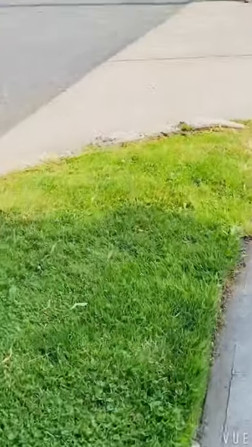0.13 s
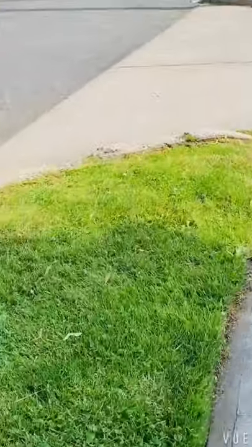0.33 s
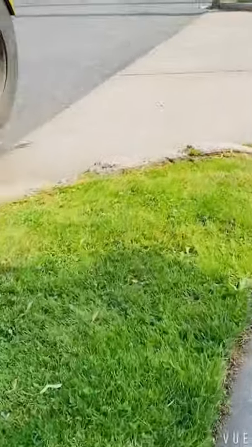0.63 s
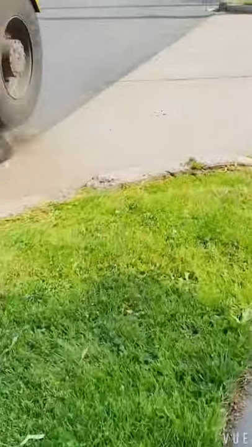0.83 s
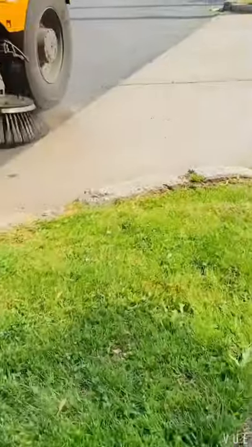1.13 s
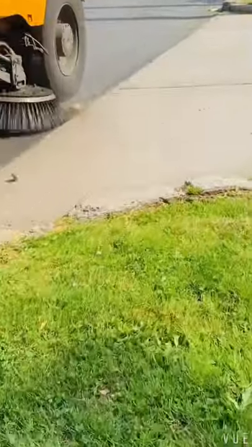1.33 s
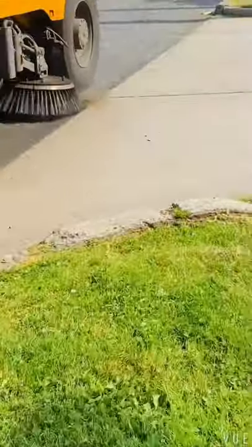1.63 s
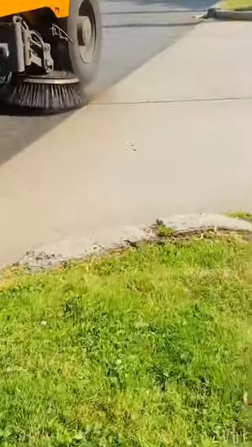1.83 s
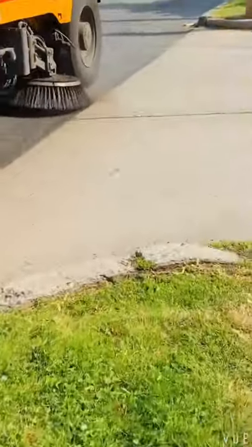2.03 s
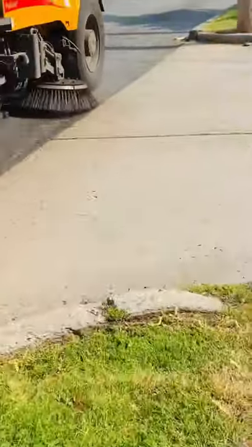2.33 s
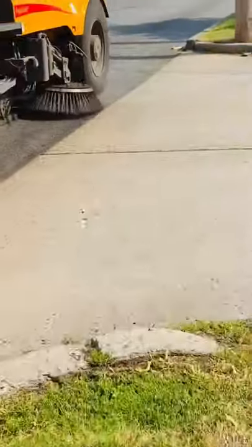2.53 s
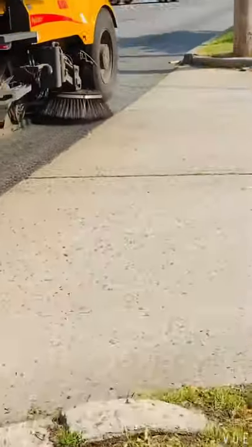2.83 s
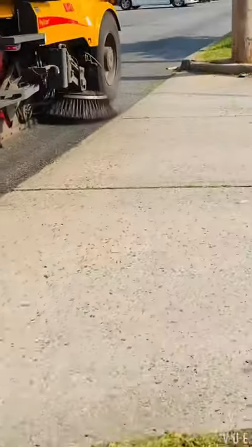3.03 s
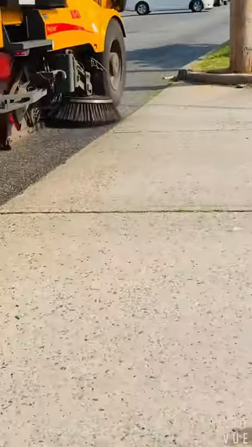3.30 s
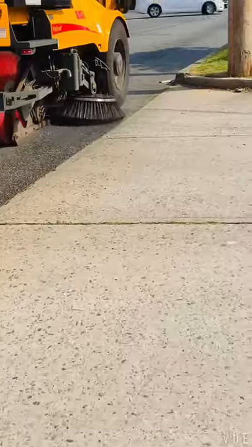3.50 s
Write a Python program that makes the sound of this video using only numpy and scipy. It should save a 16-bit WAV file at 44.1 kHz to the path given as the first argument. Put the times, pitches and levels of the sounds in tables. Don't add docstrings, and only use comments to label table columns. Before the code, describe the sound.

A street sweeper works slowly past a lawn, its diesel throbbing and suction fan rushing. Hydraulic whine rises then sinks, the wire brush hisses and ticks on grit, heard outdoors in stereo from nearby.

```python
import sys
import numpy as np
from scipy import signal
from scipy.fft import rfft, irfft, next_fast_len
from scipy.io import wavfile
from scipy.ndimage import uniform_filter1d, map_coordinates

SR = 44100
rng = np.random.default_rng(int(sys.argv[2]) if len(sys.argv) > 2 else 0)


def inscribe(sig):
    pcm = np.round(np.clip(np.atleast_2d(sig).T, -1, 1) * 32767)
    wavfile.write(sys.argv[1], SR, pcm.astype(np.int16))


def invert_db(level):
    return 10 ** (np.asarray(level, dtype=float) / 20)


N = 161406
T = np.arange(N) / SR
SHAFT_HZ = 31.56

# (time [s], level [dB])
ENGINE_SIDE = [(0.0, -23.5), (0.29, -20.5), (0.95, -25), (1.51, -31), (2.1, -28.5), (2.74, -34),
               (2.75, -30), (3.64, -28), (3.66, -26)]
# (time [s], level [dB])
BRUSH_PRESSURE = [(0.0, -38.5), (0.11, -33.5), (0.68, -29), (1.56, -28.5), (1.99, -32), (2.34, -31.5),
                  (2.97, -33), (3.1, -31), (3.15, -34.5), (3.66, -34)]


def unit(x):
    return x / np.sqrt(np.mean(x ** 2) + 1e-20)


def along(points, hz):
    f, v = np.transpose(points)
    return np.interp(np.log(hz + 1), np.log(f + 1), v)


def curves(rows):
    s, *cols = np.transpose(rows)
    return [np.interp(T, s, c) for c in cols]


def swing(rows):
    level_db, = curves(rows)
    return level_db - level_db.mean()


def wobble(rate):
    return map_coordinates(rng.standard_normal(int(N * rate / SR) + 4), [T * rate])


def filtered(x, response):
    m = next_fast_len(N + SR // 2)
    return irfft(rfft(x, m) * response(np.fft.rfftfreq(m, 1 / SR)), m)[..., :N]


def rush(spectrum, patchy_db, grit=0):
    z = signal.stft(rng.standard_normal((2, N)) + grit, nperseg=512)[2]
    field = uniform_filter1d(rng.standard_normal(z.shape[1:]), 6, 0)
    field = uniform_filter1d(field, 12, 1)
    pair = signal.istft(z * invert_db(patchy_db * unit(field)), nperseg=512)[1][:, :N]
    return unit(filtered(pair, lambda hz: invert_db(along(spectrum, hz))))


def tone(hz, level_db, drift):
    turn = 2 * np.pi * np.cumsum(hz + 0 * T) / SR + drift * wobble(9) + rng.uniform(0, 2 * np.pi)
    scattered_turn = turn + 2 * np.pi * rng.uniform() + wobble(3.98)
    return np.sqrt(2) * invert_db(level_db) * np.sin([turn, scattered_turn])


def suction_fan():
    # (frequency [Hz], density [dB per Hz])
    spectrum = [(300, -12.5), (700, -10.5), (1100, 2.5), (1400, 0.5), (1900, -4), (2500, -6.5),
                (4000, -33.5), (8000, -58)]
    level_db = -33.5 + 0.49 * swing(BRUSH_PRESSURE)
    return invert_db(level_db) * rush(spectrum, patchy_db=1.37)


def engine_roar():
    # (frequency [Hz], density [dB per Hz])
    spectrum = [(30, -51.5), (48, -7), (130, -1), (350, -2), (520, -8), (800, -14.5), (1500, -17),
                (3000, -46.5)]
    firing_depth = 0.27
    throb = 1 + firing_depth * np.sin(2 * np.pi * 2 * SHAFT_HZ * T)
    level_db = -31.5 + 0.62 * swing(ENGINE_SIDE)
    return throb * invert_db(level_db) * rush(spectrum, patchy_db=.7)


def shaft_orders():
    orders = [2, 4, 6, 7, 8, 10, 12, 14, 20, 30, 34, 9, 18, 27, 36, 72, 81, 90]
    # (level [dB], follows the engine side [dB per dB], follows the load [dB per dB])
    order_levels = [(-36, -0.64, .1), (-34, 0.35, 0.6), (-39.5, 1.28, 0), (-48, 0.4, -0), (-56, 0.68, .1),
                    (-41, 0.56, -0.2), (-43, 0.28, 0.5), (-46, 0.045, -0.3), (-55.5, 2.2, -0.4),
                    (-52, -0.16, .1), (-46, 0.0073, 0.2), (-40, 1.95, 0.2), (-58.5, 2.2, .1),
                    (-57, 1.3, -0), (-53.5, 0.77, .1), (-57.5, -0.043, .1), (-56.5, 0.7, 0), (-49, .2, .1)]
    sway_db, drift_rad = .6, .1
    side_db, load_db = swing(ENGINE_SIDE), swing(BRUSH_PRESSURE)
    lines = np.zeros((2, N))
    for order, (db, side, load) in zip(orders, order_levels):
        level_db = db + side * side_db + load * load_db + sway_db * wobble(4.86)
        lines += tone(order * SHAFT_HZ, level_db, drift_rad * np.sqrt(order))
    return lines


def hydraulic_whines():
    # (time [s], pitch [Hz], level [dB])
    drive_motor = [(0, 340, -40), (.25, 352, -36), (.4, 357, -30), (.6, 368, -26.5), (.72, 370, -34),
                   (.83, 375, -31), (.97, 382, -28), (1.1, 376, -35), (1.2, 370, -44), (1.45, 350, -56),
                   (1.6, 322, -41), (1.9, 335, -41), (2.1, 326, -29.5), (2.25, 328, -37), (2.6, 320, -48),
                   (3.66, 320, -52)]
    # (time [s], pitch [Hz], level [dB])
    brush_motor = [(0, 515, -42), (.2, 535, -41), (.35, 535, -52), (1.1, 492, -52), (1.25, 495, -44),
                   (1.5, 545, -49), (2.3, 545, -52), (2.55, 542, -39), (2.7, 535, -45), (2.9, 523, -41),
                   (3.2, 525, -43), (3.4, 548, -47), (3.66, 546, -47)]
    flutter_percent, sway_db, drift_rad = 1.1, 2, 1.1
    whines = np.zeros((2, N))
    for motor in (drive_motor, brush_motor):
        hz, db = curves(motor)
        fluttering_hz = hz * (1 + flutter_percent / 100 * wobble(25.09))
        whines += tone(fluttering_hz, db + sway_db * wobble(20), drift_rad)
    return whines


def metal_ping():
    start_s, ping_hz, ping_db, t60_s, rise_s = .252, 1950, -28, .12, 0.0034
    t = np.maximum(T - start_s, 0)
    decay = invert_db(ping_db - 60 * t / t60_s)
    return decay * (1 - np.exp(-t / rise_s)) * np.sin(2 * np.pi * ping_hz * t)


def debris_scrapes():
    # (time [s], length [s], centre [Hz], width [octaves], level [dB])
    bursts = [(.037, .006, 2450, .15, -31), (.15, .2, 2300, .22, -36), (.16, .11, 635, .05, -37),
              (.262, .012, 3200, .7, -31), (.29, .012, 4450, .08, -30), (.335, .014, 4400, .1, -30),
              (.436, .007, 4500, .3, -26), (.445, .008, 3800, .06, -29), (.625, .008, 4400, .3, -27),
              (.65, .03, 3150, .08, -32), (.722, .008, 4100, .15, -29), (.822, .007, 2600, .3, -28),
              (1.03, .008, 4060, .15, -28), (1.367, .007, 4100, .15, -30), (1.753, .007, 3800, .15, -29),
              (2.112, .005, 3650, .07, -27), (2.13, .005, 4300, .15, -31), (2.237, .005, 4560, .06, -31),
              (2.3, .005, 4300, .15, -30), (2.365, .008, 4200, .15, -35), (2.438, .008, 3240, .1, -27),
              (2.5, .012, 4150, .12, -30), (2.615, .006, 3120, .1, -30), (3.05, .007, 2950, .05, -31),
              (3.055, .016, 4800, .18, -30), (3.078, .018, 4400, .3, -29), (3.102, .016, 3900, .12, -28),
              (3.1, .02, 2900, .25, -28.5)]
    size = SR // 2
    rasps = np.zeros((2, N + SR))
    t = np.arange(-size // 2, size // 2) / SR
    hz = np.fft.rfftfreq(size, 1 / SR) + 1
    for s, length, centre_hz, octaves, db in bursts:
        bell = np.exp(-(np.log2(hz / centre_hz) / octaves) ** 2 / 2)
        band = irfft(rfft(rng.standard_normal((2, size))) * bell, size)
        swell = np.exp(-(t / length) ** 2 * 2)
        burst = invert_db(db) * unit(band * swell) * np.sqrt(np.mean(swell ** 2))
        rasps[:, round(s * SR):][:, :size] += burst
    return rasps[:, size // 2:][:, :N]


def wire_brush():
    # (frequency [Hz], density [dB per Hz])
    wires = [(1200, -30), (2700, -1), (3400, -3), (4150, 0), (4500, -1), (4900, -3), (5400, -6.5),
             (7500, -9.5), (9600, -7), (13500, -4.5), (15800, -8)]
    grit_per_s, grit_spread_db, grit_db = 2600, 1.5, -6
    turn_hz, beat_db, sway_db = 2.78, 0, .6

    hits = rng.uniform(size=N) < grit_per_s / SR
    grains = hits * rng.standard_normal((2, N)) * invert_db(grit_spread_db * rng.exponential(size=N))
    hiss = rush(wires, patchy_db=1.18, grit=invert_db(grit_db) * unit(grains))

    pressure_db, = curves(BRUSH_PRESSURE)
    beat = beat_db * np.sin(2 * np.pi * turn_hz * T) + sway_db * wobble(12)
    return invert_db(pressure_db + 5 + beat) * hiss


def microphone_port(pair, sign):
    # (frequency [Hz], correlation [0..1])
    alike = [(100, .998), (450, .98), (650, .8), (800, .35), (1100, .8), (1380, .91), (1900, .78),
             (2480, .25),
             (2750, .64), (3200, .7), (3550, .6), (3950, .85), (4350, .94), (4650, .78), (5050, .5),
             (5800, .55), (7000, .6), (8300, .87), (11000, .87), (12300, .7), (14000, .6)]
    # (frequency [Hz], level difference [dB])
    left_over_right = [(40, 0), (170, 1.8), (450, 2.8), (800, 10), (1100, 7), (1380, 2), (1550, 4.5), (1750, 2),
                       (2240, 1), (2650, -3.2), (2950, 0), (3450, 3.2), (3800, -.7), (5000, .5), (5340, -2.5),
                 (6200, 0)]
    # (frequency [Hz], phase lead [rad])
    lead = [(20, 0), (430, .04), (690, .85), (860, -.85), (1100, -1.17), (1400, -.48), (1900, -.05),
            (2400, -.15),
            (2620, 2.2), (3250, 2.05), (3450, 2.95), (3800, 5.65), (3980, 6.2), (4450, 6.36),
                (4750, 6.9), (5150, 7.2),
            (5500, 8), (7000, 9.05), (8300, 9.4), (11300, 9.45), (12400, 9.9), (13800, 10.6),
                 (15800, 11.9)]

    def gains(hz):
        likeness = np.clip(along(alike, hz), 0, 1)
        turn = np.arccos(likeness) / 2
        level = invert_db(along(left_over_right, hz) * sign / 2)
        phase = np.exp(.5j * sign * along(lead, hz))
        return level * phase * [np.cos(turn), sign * np.sin(turn)]

    return filtered(pair, gains).sum(axis=0)


def scene():
    # (time [s], level [dB])
    scatter = [(0, 3.5), (.45, 3), (1, 0), (2, -1), (3.66, -1)]
    pair = suction_fan() + engine_roar() + shaft_orders() + hydraulic_whines()
    pair = pair + metal_ping() + debris_scrapes() + wire_brush()
    below_treble = filtered(pair, lambda hz: hz < 6500)
    pair = pair + below_treble * [0 * T, invert_db(curves(scatter)[0]) - 1]
    return np.array([microphone_port(pair, sign) for sign in (1, -1)])


def thin_treble(dry):
    mid_drop_db, side_drop_db, hole_db, ragged_db = -6.5, -11.5, -4.6, -1.5
    top_hz, ragged_hz = 15750, 15100
    hz, _, z = signal.stft([dry[0] + dry[1], dry[0] - dry[1]], SR, nperseg=2048)
    bins = len(hz)
    high, higher = hz[:, None] > 1500, hz[:, None] > 5000

    smooth = uniform_filter1d(abs(z) ** 2, size=2, axis=2)
    bands = np.add.reduceat(smooth, np.arange(0, bins, 16), axis=1)
    mid, side = np.sqrt(np.repeat(bands, 16, axis=1)[:, :bins])
    keep_mid = ~higher | (mid > side * invert_db(mid_drop_db))
    keep_side = ~high | (side > mid * invert_db(side_drop_db))
    keep = (hz[:, None] < top_hz) & np.array([keep_mid, keep_side])

    power = uniform_filter1d(abs(z) ** 2, size=3, axis=2)
    strips = np.add.reduceat(power, np.arange(0, bins, 4), axis=1)
    strips = np.repeat(strips, 4, axis=1)[:, :bins] / 4
    keep &= ~high | (strips > uniform_filter1d(power, size=40, axis=1) * invert_db(2 * hole_db))

    top = power[1, (hz > ragged_hz) & (hz < top_hz)].mean(axis=0)
    keep[1, hz > ragged_hz] &= top > uniform_filter1d(top, size=20) * invert_db(ragged_db)
    mid, side = signal.istft(z * keep, SR, nperseg=2048)[1][:, :N] / 2
    return np.array([mid + side, mid - side])


def low_pass(x):
    return signal.sosfilt(signal.butter(12, 16430, fs=SR, output="sos"), x)


def record(dry):
    mix = thin_treble(dry)
    return low_pass(mix)


dry = scene()
out = record(dry)
inscribe(out)
```